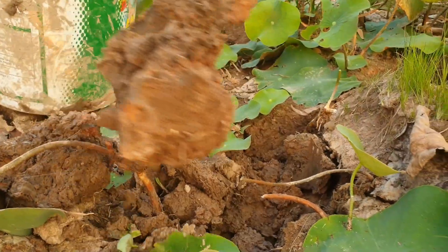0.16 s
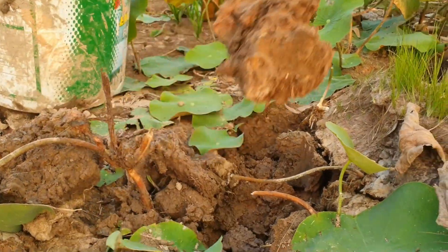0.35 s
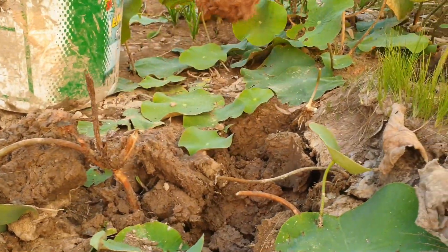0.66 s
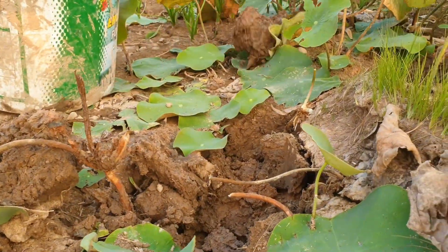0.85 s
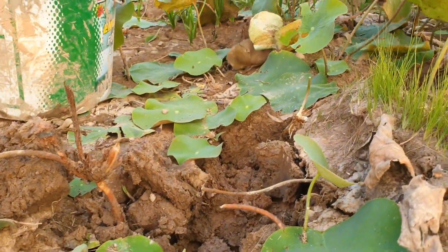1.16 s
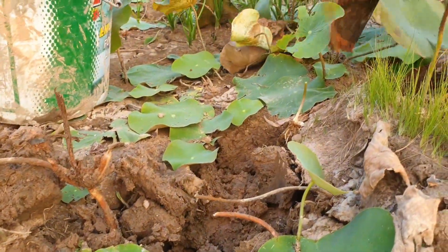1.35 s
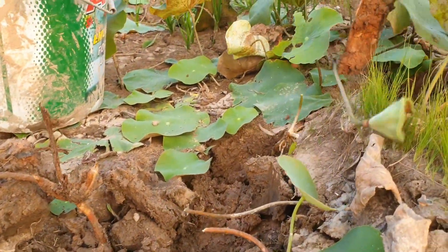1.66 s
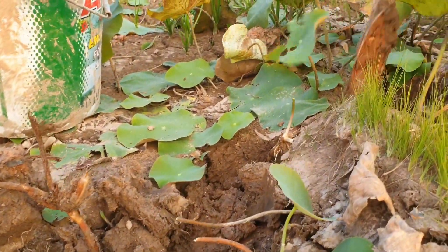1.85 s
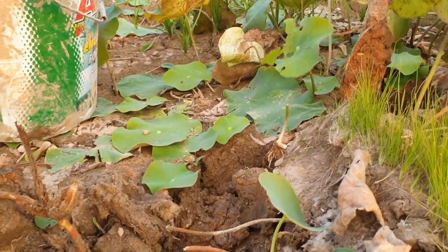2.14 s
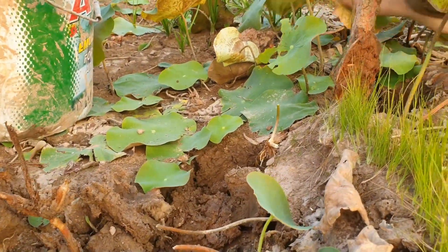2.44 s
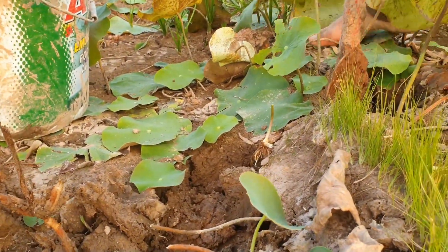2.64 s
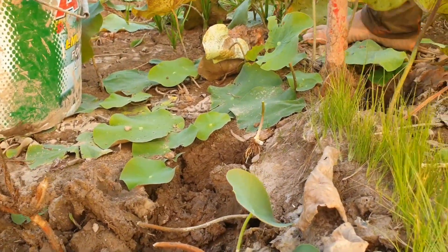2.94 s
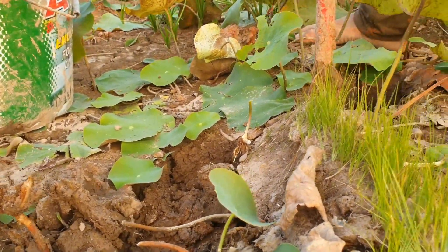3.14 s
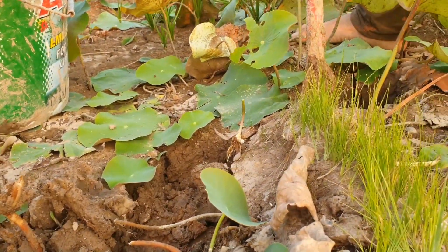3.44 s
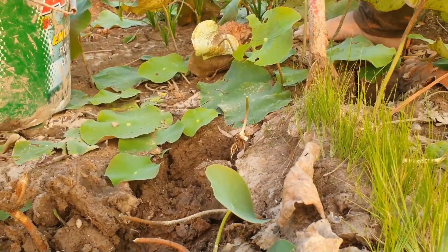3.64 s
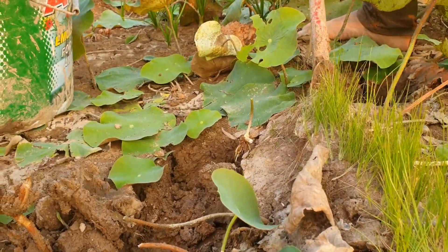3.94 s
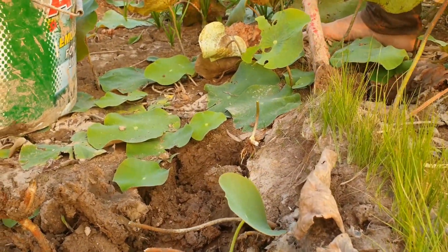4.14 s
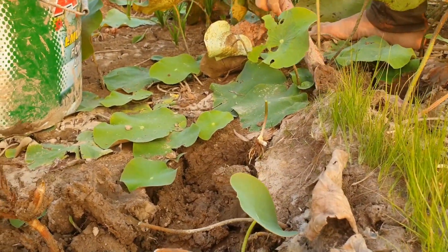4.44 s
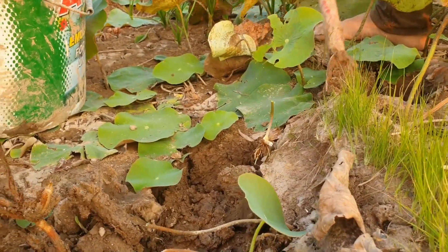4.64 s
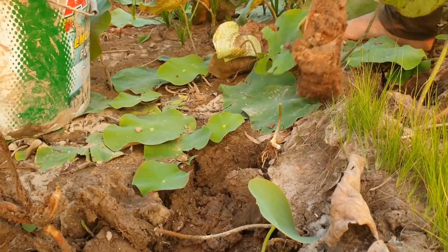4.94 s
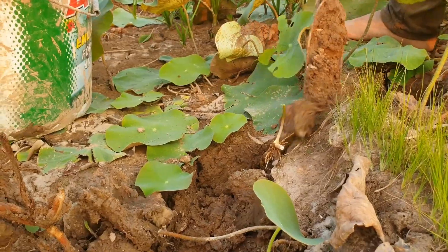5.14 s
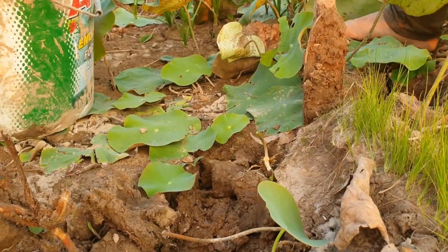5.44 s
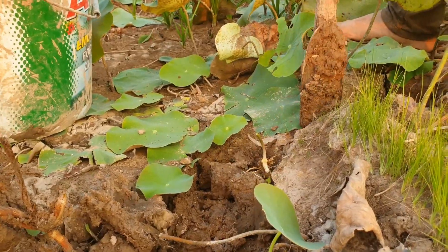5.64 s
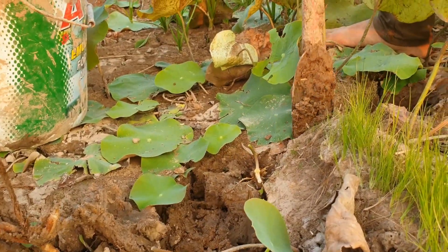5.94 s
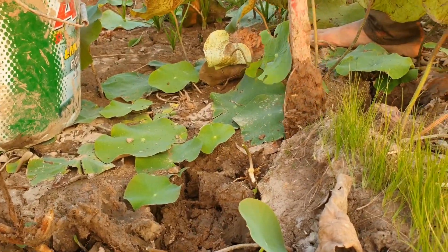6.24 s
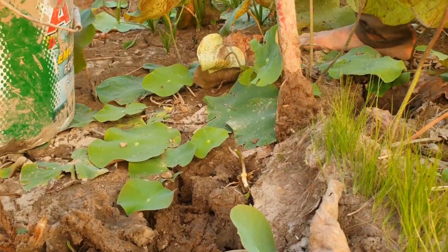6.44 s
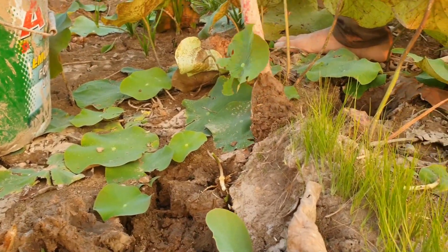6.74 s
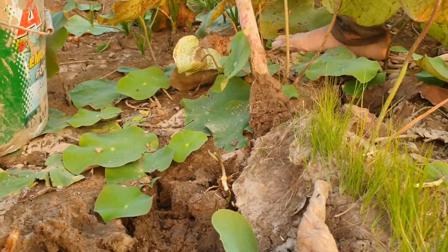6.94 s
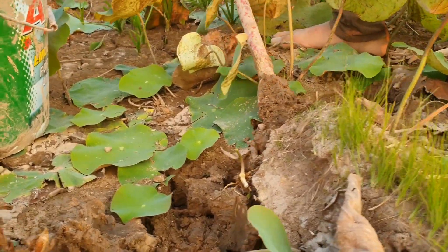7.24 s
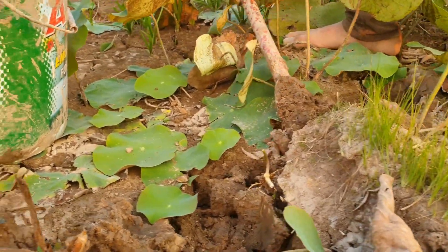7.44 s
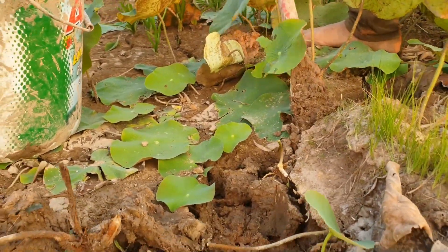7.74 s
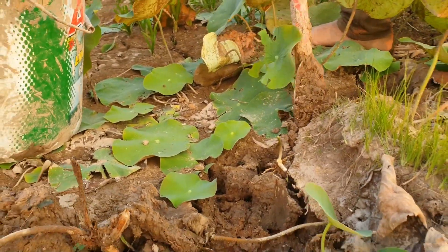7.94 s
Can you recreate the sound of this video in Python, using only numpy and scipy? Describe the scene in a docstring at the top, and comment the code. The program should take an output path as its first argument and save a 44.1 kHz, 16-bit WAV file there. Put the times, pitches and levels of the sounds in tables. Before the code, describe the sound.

A clod of damp clay slaps through leaves and thuds down, then a spade slides into wet earth and levers it loose with snapping roots.

```python
"""Digging damp clay with a spade

A spade works damp clay in a drained lotus pond, close to the microphone. A thrown clod slaps through
leaves and thuds down; the blade then slides in and levers the bank loose. Clay, roots and leaves are
clouds of tiny noise bursts, snaps are bright ringing bursts, and thuds are sagging low tones with a puff
of noise. Behind them lie filtered noise for the outdoor rumble and noise bands for drone and insects."""
import sys
import numpy as np
from scipy import signal
from scipy.fft import rfft, irfft, next_fast_len
from scipy.io import wavfile
from scipy.ndimage import uniform_filter1d

SR = 44100
rng = np.random.default_rng(int(sys.argv[2]) if len(sys.argv) > 2 else 0)


def persist_wave(psi):
    """Save psi, clipped to +-1, as 16-bit WAV."""
    counts = np.round(np.clip(psi, -1, 1) * 32767).astype(np.int16)
    wavfile.write(sys.argv[1], SR, np.atleast_2d(counts).T)


N = 356592  # length of the scene in samples


def amp(db):
    """Turns decibels into a gain."""
    return 10 ** (np.asarray(db) / 20)


def unit(x):
    """Scales a sound to an rms of one."""
    return x / np.sqrt(np.mean(x ** 2) + 1e-20)


def read(points, hz):
    """Reads a spectrum between its points, on a log-frequency axis."""
    f, value = np.transpose(points)
    return np.interp(np.log(hz + 1), np.log(f + 1), value)


def add(mix, s, sound):
    """Adds a stereo sound to the mix at time s, cutting what falls outside."""
    at = round(s * SR)
    sound = sound[:, max(-at, 0):]
    part = mix[:, max(at, 0):][:, :sound.shape[1]]
    part += sound[:, :part.shape[1]]


def colour(x, gain):
    """Filters x by a gain that is a function of frequency."""
    size = next_fast_len(x.shape[-1] + 512)
    spectrum = rfft(x, size) * gain(np.fft.rfftfreq(size, 1 / SR))
    return irfft(spectrum, size)[..., :x.shape[-1]]


# how alike left and right are: (frequency [Hz], likeness [0-1])
LIKENESS = [(60, 0.75), (250, 0.7), (600, 0.97), (1100, 0.58), (2000, 0.55), (4000, 0.052), (8000, 0.047),
            (16000, 0.078)]


def pair(n):
    """White noise at two microphone ports: largely shared up to about 2 kHz, nearly unrelated from 4 kHz."""
    a, b = rfft(rng.standard_normal((2, n)))
    alike = np.clip(read(LIKENESS, np.fft.rfftfreq(n, 1 / SR)), 0, 1)
    return irfft(np.array([a, alike * a + np.sqrt(1 - alike ** 2) * b]), n)


def ring(x, hz, q):
    """A resonance: it favours sound near one pitch, and a low q makes it broad and quick to die."""
    w = 2 * np.pi * min(hz, SR / 2 - 1000) / SR
    damp = np.sin(w) / (2 * q)
    return signal.lfilter([damp, 0, -damp], [1 + damp, -2 * np.cos(w), 1 - damp], x)


def grains(n, per_s, spread_db, grain_s, count=8, size=256):
    """A cloud of tiny fractures of random strength, each a short fading burst in one of a few shapes."""
    strength_db = spread_db * np.minimum(rng.exponential(1, n), 4.5)
    clicks = amp(strength_db) * (rng.random(n) < per_s / SR)
    clicks *= rng.choice([-1, 1], n)
    shape = rng.integers(0, count, n)
    fade = np.exp(-np.arange(size) / SR / grain_s)
    cloud = np.zeros((2, n))
    for k in range(count):
        burst = unit(pair(size) * fade)
        cloud += signal.oaconvolve((clicks * (shape == k))[None], burst, axes=1)[:, :n]
    return unit(cloud)


# shape of the open-air rumble: (frequency [Hz], relative level [dB])
RUMBLE = [(20, -30), (40, 1), (60, 3), (90, -3), (125, -1), (170, -8.5), (250, -12.5), (400, -30.5),
          (800, -41), (2000, -45), (5000, -45), (10000, -33.5), (16000, -59)]
# far drone and insect bands: (centre [Hz], width [Hz], rms level [dB])
DRONE_AND_INSECTS = [(63.8, 8.5, -54), (110, 13, -64.5), (2030, 200, -84), (7054, 140, -66.5),
                     (7450, 520, -66.5), (11200, 1300, -73)]


def background(rumble_db=-55, pan_db=-3):
    """Outdoor rumble is shaped noise; the far drone and thin insect song are narrower bands of noise."""
    air = amp(rumble_db) * unit(colour(pair(N), lambda hz: amp(read(RUMBLE, hz))))
    for centre, width, db in DRONE_AND_INSECTS:
        band = colour(pair(N), lambda hz: 1 / (1 + (2 * (hz - centre) / width) ** 2))
        air += amp(db) * unit(band)
    # the lows lean to the right
    sides = np.array([[pan_db], [-pan_db]]) / 2
    return colour(air, lambda hz: amp(sides / (1 + (hz / 400) ** 2)))


# steady strain of the spade on the bank between pushes: (time [s], effort [dB])
STEADY_STRAIN = [(0.7, -88), (1.45, -62), (3.1, -69), (3.3, -65.5), (3.5, -67.5), (3.8, -60), (4.05, -65),
                 (4.47, -65.5), (5.0, -73), (5.45, -67), (5.55, -59.5), (5.85, -61.5), (6.1, -69.5),
                 (6.3, -64), (6.8, -58.5), (7.5, -65.5), (7.95, -73), (8.08, -67.5)]
# under steady strain the clay stays below the roots, and the leaves follow only part of each change
STRAIN_CLAY_DB, STRAIN_LEAVES_DB, STRAIN_USUAL_DB, LEAVES_FOLLOW = -5, -62.5, -65, 0.43
# pushes of the spade and tumbles of clods: (start [s], hold [s], effort [dB],
# swell over the hold [dB], extra clay [dB], extra leaves [dB])
SPADE_PUSHES = [(0.0, 0.039, -47.5, -4.5, -2, 2), (0.148, 0.049, -56, -2.5, -4, -1.5),
                (0.37, 0.048, -66.5, 0, -6, 5), (0.759, 0.045, -56, 7.5, -6, -0.5),
                (0.822, 0.583, -46.5, -7.5, 0.5, 1.5), (1.445, 0.058, -66.5, -3, 4, 9),
                (1.573, 0.12, -71, 5.5, 11.5, -14), (1.699, 0.034, -49.5, 0, -2.5, 1),
                (1.848, 0.015, -58.5, 3.5, -7, -5), (2.062, 0.06, -54, -5.5, 1.5, -3),
                (2.313, 0.23, -49.5, 5, -3, -3), (2.559, 0.47, -50, -8.5, -0.5, -0.5),
                (3.593, 0.084, -67.5, 2.5, 2.5, 6), (3.906, 0.054, -54.5, 0, -3.5, -3),
                (4.108, 0.28, -60, 4, -2.5, 1), (4.558, 0.21, -58, -4.5, -0.5, -1),
                (4.82, 0.066, -60.5, -0.5, -1, 3), (5.065, 0.11, -60.5, 7, -9.5, 1.5),
                (5.304, 0.025, -48.5, -4, -16, -1), (5.352, 0.1, -72, 5.5, -19, 14),
                (6.232, 0.14, -56, -2.5, -2, 1.5), (6.508, 0.1, -43.5, 8, -15.5, -5),
                (6.927, 0.48, -59.5, 6.5, -4.5, -2), (7.585, 0.065, -61.5, -1, -2.5, 5)]
ATTACK_DB_PER_S, RELEASE_DB_PER_S = 478, 250


def work():
    """Work on clay, roots and leaves in dB: the steady strain plus pushes that attack, hold and release."""
    t = np.arange(0, N, 64) / SR
    strain = np.interp(t, *np.transpose(STEADY_STRAIN))
    leaves_strain = STRAIN_LEAVES_DB + LEAVES_FOLLOW * (strain - STRAIN_USUAL_DB)
    power = amp([strain + STRAIN_CLAY_DB, strain, leaves_strain]) ** 2
    for start, hold, db, swell_db, clay_db, leaves_db in SPADE_PUSHES:
        age = t - start
        push = db + swell_db * np.clip(age / hold, 0, 1)
        push -= ATTACK_DB_PER_S * np.maximum(-age, 0) + RELEASE_DB_PER_S * np.maximum(age - hold, 0)
        power += amp([push + clay_db, push, push + leaves_db]) ** 2
    return [np.interp(np.arange(N) / SR, t, 10 * np.log10(p)) for p in power]


def hollows(x, patchy_db=3.5):
    """Cavities open and close between the clods: short-lived resonances come and go."""
    z = signal.stft(x, nperseg=512)[2]
    field = rng.standard_normal(z.shape[1:])
    field = uniform_filter1d(field, size=6, axis=0)  # smooth over pitch
    field = unit(uniform_filter1d(field, size=5, axis=1))  # smooth over time
    return signal.istft(z * amp(patchy_db * field), nperseg=512)[1][:, :x.shape[1]]


def worked(work_db, spectrum, db, per_s, spread_db, grain_s, clump_db):
    """One material giving way: grains come in stick-slip clumps, as strong as the work on it."""
    slips = np.clip(unit(uniform_filter1d(rng.standard_normal(N), size=400)), -2, 2)
    cloud = hollows(grains(N, per_s, spread_db, grain_s) * amp(clump_db * slips))
    cloud = colour(cloud, lambda hz: amp(read(spectrum, hz)))
    # the work done in each moment is shared among its grains
    power = abs(uniform_filter1d((cloud ** 2).mean(0), size=4000))
    cloud /= np.sqrt(power + 1e-9)
    return cloud * amp(db + work_db)


def heft(clay, work_db, under_hz=480, full_db=-50, bass_db_per_db=0.2, most_db=2, least_db=-7):
    """Only hard work moves whole lumps, so the bass of the clay fades faster than its level."""
    lumps = colour(clay, lambda hz: 1 / (1 + (hz / under_hz) ** 4))
    bass_db = np.clip(bass_db_per_db * (work_db - full_db), least_db, most_db)
    return clay + lumps * (amp(bass_db) - 1)


# colours of the clay, root and leaf grains: (frequency [Hz], relative level [dB])
CLAY_COLOUR = [(60, -19), (150, -0.5), (260, 2), (480, -1), (1100, -3), (1900, -1.5), (3000, -5),
               (6000, -22.5)]
ROOT_COLOUR = [(600, -49), (1600, -20), (2600, 0), (3700, 0), (6000, -3), (7500, 0), (10000, -16),
               (16000, -12.5)]
LEAF_COLOUR = [(2000, -86), (5000, -1.5), (7200, -1), (9000, -2), (12000, 1.5), (15500, -6)]


def digging(clay_db, roots_db, leaves_db):
    """Clay crumbles low, roots tear in the middle, leaves and grass rustle on top."""
    clay = worked(clay_db, CLAY_COLOUR, db=2.7, per_s=1100, spread_db=1.5, grain_s=0.0015, clump_db=1.4)
    roots = worked(roots_db, ROOT_COLOUR, db=0.88, per_s=1200, spread_db=-0.5, grain_s=0.0013, clump_db=-0.7)
    leaves = worked(leaves_db, LEAF_COLOUR, db=2.5, per_s=2400, spread_db=2.5, grain_s=0.0016, clump_db=2.5)
    return heft(clay, clay_db) + roots + leaves


# resonances of the clay-caked steel blade: (centre [Hz], width [Hz], relative level [dB])
BLADE_RINGS = [(1000, 850, -8.5), (2150, 720, -4.5), (3500, 740, 4.5), (4405, 260, 6), (5860, 1170, 1)]
# how freely the blade rings, high once it is lifted out: (time [s], share [0-1])
BLADE_FREEDOM = [(5.2, 0.22), (5.29, 0.92), (5.8, 0.57), (6.4, 0.85), (6.6, 0)]


def blade(x, db=4):
    """Crumbs breaking on the blade take on its damped ring, the more so the freer it is."""
    free = np.clip(np.interp(np.arange(N) / SR, *np.transpose(BLADE_FREEDOM)), 0, 1)
    steel = sum(amp(mode_db + db) * ring(x, hz, hz / width) for hz, width, mode_db in BLADE_RINGS)
    # the ring takes the place of much of the plain sound
    return x - 0.98 * free * ring(x, 3350, 0.36) + free * steel / 2


def bank(x, db=-15, t60=0.031, size=8192):
    """Earth banks and leaves throw back a short, faint scatter of echoes."""
    t = np.arange(size) / SR
    sparse = (rng.random((2, size)) < .06) * (t > .003)
    taps = rng.standard_normal((2, size)) * sparse * amp(-60 * t / t60)
    taps /= np.linalg.norm(taps, axis=1, keepdims=True)
    return x + amp(db) * signal.oaconvolve(x, taps, axes=1)[:, :N]


# clods brushing leaves or tearing loose: (time of the crest [s], rms level [dB], centre [Hz], fall [s])
CLOD_CRUNCHES = [(0.009, -34, 6060, 0.0037), (0.811, -28.5, 3500, 0.0035), (0.826, -27.5, 2200, 0.011),
                 (0.835, -25, 6800, 0.0047), (0.87, -36, 7030, 0.01), (0.968, -39.5, 1500, 0.012),
                 (1.01, -37.5, 1000, 0.019), (1.101, -33, 5460, 0.01), (1.163, -36, 6450, 0.01),
                 (1.313, -29.5, 6150, 0.0044), (1.3151, -26.5, 680, 0.0072), (1.32, -38.5, 1380, 0.011),
                 (1.388, -41, 1770, 0.015), (1.457, -40, 1000, 0.0057), (1.517, -33.5, 2270, 0.0066),
                 (2.526, -37.5, 1800, 0.024), (4.323, -40, 1740, 0.015), (4.324, -43, 10000, 0.008),
                 (4.842, -35, 11000, 0.006), (5.154, -39, 5000, 0.01), (5.181, -37.5, 675, 0.0069),
                 (6.271, -32.5, 1300, 0.0013), (6.606, -36, 5270, 0.033), (7.02, -37, 1710, 0.0079),
                 (7.265, -43, 2500, 0.028)]
CRUNCH_RISE_SHARE = 0.45  # a crunch swells in this share of the time it takes to fall


def crunches(q=0.84, per_s=3500, spread_db=2.5):
    """A dense rush of fractures swells to a crest and dies away."""
    out = np.zeros((2, N))
    t = np.arange(-SR // 8, SR // 5) / SR  # zero at the crest
    for s, crest_db, hz, fall in CLOD_CRUNCHES:
        swell = np.exp(np.where(t < 0, t / (CRUNCH_RISE_SHARE * fall), -t / fall))
        rush = ring(grains(len(t), per_s, spread_db, 0.00053, count=4), hz, q) * swell
        rush *= np.linalg.norm(swell) / np.linalg.norm(rush.mean(0)) / np.sqrt(2)
        add(out, s + t[0], amp(crest_db) * rush)
    return out


def snap(peak_db, hz, pan_db, q=1.6, bright_db=-8, rings_db=-1, ring_q=8, ring_octaves=1.76,
         crack_s=0.0026, tick_db=5, tick_s=0.00022, scatter_db=-21, scatter_s=0.0094, size=2048):
    """A fibre breaks with a tick, a sharp burst and a few brief rings; leaves scatter a faint tail."""
    t = np.arange(size) / SR
    tick = amp(tick_db) * np.exp(-t / tick_s)
    crack = np.exp(-t / crack_s)
    scatter = amp(scatter_db) * np.exp(-t / scatter_s)
    burst = pair(size) * (tick + crack + scatter)
    sound = ring(burst, hz, q) + amp(bright_db) * ring(burst, hz, 0.42)
    for octaves in rng.uniform(-ring_octaves, 1, size=3):
        sound += amp(rings_db) * ring(burst, hz * 2 ** octaves, ring_q)
    sides_db = np.array([[pan_db], [-pan_db]]) / 2
    return sound / abs(sound).max(1, keepdims=True) * amp(peak_db + sides_db)


# roots, stalks and crumbs snapping, before the shared level and pitch settings below:
# (time [s], peak level [dB], centre [Hz], left minus right [dB])
FIBRE_SNAPS = [(0.0198, -23, 8100, 6), (0.83, -19, 8200, -3), (0.834, -14, 7650, 7), (1.215, -26, 5400, 1),
               (1.518, -36, 4550, 5), (1.5967, -30.5, 4730, 2), (1.937, -25, 6760, 3),
               (1.9998, -16.5, 4900, -0.5), (2.0025, -20, 4630, -2), (2.849, -30, 9500, -2),
               (3.1762, -37, 11000, -11), (3.257, -33, 7700, -2), (3.4344, -36, 10100, -10),
               (3.6705, -29.5, 6300, 0), (3.851, -30.5, 9800, -2), (4.1651, -23.5, 6400, 0),
               (4.168, -20.5, 4970, -1), (4.2391, -20, 4260, 1), (4.3184, -23, 8700, -4),
               (4.389, -28.5, 8200, -1), (4.5598, -29.5, 8340, -3), (4.839, -17.5, 7700, -2),
               (5.092, -27, 9100, -2), (5.1354, -22.5, 6200, 5), (5.151, -20.5, 6150, 3.5),
               (5.321, -30.5, 4060, 4), (5.436, -31, 7160, -4), (5.4647, -31, 5560, 2),
               (5.512, -27.5, 4900, 5), (5.6804, -30.5, 6230, 0), (5.7282, -30.5, 4800, -2),
               (5.759, -28.5, 4100, 1.5), (6.138, -31.5, 7200, 4), (6.455, -30, 3400, 0),
               (6.7713, -27, 6760, 1), (6.8829, -22, 4570, -4), (6.9184, -28, 6460, 4),
               (6.9382, -26.5, 5340, 0), (6.968, -21.5, 8100, -1), (7.0181, -27.5, 4970, -3),
               (7.075, -19.5, 8900, -2.5), (7.1894, -27, 5600, 3), (7.234, -25, 5900, 3),
               (7.2604, -21.5, 10100, 2), (7.322, -25, 7740, 1), (7.3435, -25, 6900, -1),
               (7.3782, -25, 7300, 0)]


def snaps(db=1.0, pitch_factor=0.837):
    """The loud breaks of roots, stalks and crumbs, each at its own time and side."""
    out = np.zeros((2, N))
    for s, peak_db, hz, pan_db in FIBRE_SNAPS:
        add(out, s, snap(peak_db + db, hz * pitch_factor, pan_db))
    return out


def thud(db, hz, t60, puff_db=-8, puff_q=1.18, sag=0.15, onset_s=0.00015, size=16384):
    """Soft ground takes a blow: a damped swing that sags in pitch, with a puff of loose earth."""
    t = np.arange(size) / SR
    pitch = hz * (1 + sag * np.exp(-t / 0.0088))
    swing = np.sin(2 * np.pi * np.cumsum(pitch) / SR)
    puff = unit(ring(ring(pair(size), hz, puff_q), hz, puff_q))
    # the longer the ground gives, the softer the blow begins
    press = 1 - np.exp(-t / (onset_s + t60 ** 2 / 4))
    return press * (swing + amp(puff_db) * puff) * amp(db - 60 * t / t60)


# dull blows of clay and blade: (time [s], level before the soft onset [dB], settled pitch [Hz],
# time to fall by 60 dB [s])
DULL_BLOWS = [(0.826, -36, 254, 0.14), (.959, -33.5, 224, 0.14), (1.004, -40.5, 335, 0.061),
              (1.105, -40.5, 137, 0.14), (1.3132, -13, 223, 0.01), (1.3154, -31, 76, 0.19),
              (1.455, -39.5, 247, 0.065), (1.946, -34.5, 94.6, 0.26), (2.060, -41, 233, 0.051),
              (2.894, -42, 238, 0.082), (5.178, -32, 240, 0.031), (6.269, -35, 342, 0.012),
              (6.459, -31.5, 151, 0.036), (6.471, -32, 181, 0.19), (7.304, -37.5, 166, 0.096),
              (7.367, -40, 225, 0.086), (7.561, -42, 213, 0.085)]
SHIFTING = (7.4, 8.09)  # while the loosened block of clay shifts on the blade: (start [s], end [s])


def thuds(count=7, bump_db=-48, bump_hz=232, bump_octaves=0.3, bump_t60=0.1):
    """The dull blows, then an uneven run of soft bumps as the loosened block shifts."""
    out = np.zeros((2, N))
    for s, db, hz, t60 in DULL_BLOWS:
        add(out, s, thud(db, hz, t60))
    for k, (late, pitch) in enumerate(rng.random((count, 2))):
        s = SHIFTING[0] + (k + late) / count * (SHIFTING[1] - SHIFTING[0])
        add(out, s, thud(bump_db, bump_hz * 2 ** (bump_octaves * (pitch - .5)), bump_t60))
    return out


def moving(x, hz, width):
    """A resonance that follows the curve hz: shift that pitch to zero, smooth, and shift back."""
    turn = np.exp(2j * np.pi * np.cumsum(hz) / SR)
    r = np.exp(-np.pi * width / SR)
    return 2 * (turn * signal.lfilter([1 - r], [1, -r], x / turn)).real


# the blade sliding along wet clay, before the shared level setting below: (start [s], end [s],
# crest rms level [dB], first pitch [Hz], last pitch [Hz], width of each resonance pass [Hz])
BLADE_SCRAPES = [(1.655, 1.743, -42.5, 1150, 800, 960), (2.248, 2.443, -45.5, 1300, 1080, 1200),
                 (2.266, 2.417, -45, 5360, 5900, 2000), (2.636, 2.742, -44.5, 3300, 2980, 1400),
                 (4.58, 4.77, -51, 2300, 800, 970), (6.484, 6.69, -47, 3020, 3360, 1700)]


def scrapes(per_s=1800, spread_db=3, db=-1):
    """Wet clay drags on the blade; the gap between them changes, so its hollow pitch slides."""
    out = np.zeros((2, N))
    for start, end, crest_db, first_hz, last_hz, width in BLADE_SCRAPES:
        n = max(int((end - start) * SR), 512)
        hz = np.geomspace(first_hz, last_hz, n)
        drag = grains(n, per_s, spread_db, 0.0011, count=4)
        drag = moving(moving(drag, hz, width), hz, width)
        swell = np.sin(np.linspace(0, np.pi, n))
        add(out, start, unit(drag) * swell * amp(crest_db + db))
    return out


PRYING = (3.15, 7.7)  # while the spade levers the bank and roots part: (start [s], end [s])


def grit(roots_db, leaves_db, count=260, over_db=21, spread_db=5.0, ceiling_db=-29,
         low_hz=1900, octaves=2.7, side_db=9, crack_s=0.00097):
    """Under the lever, rootlets and crumbs tick at random, louder (up to a ceiling) in harder work."""
    out = np.zeros((2, N))
    effort_db = np.maximum(roots_db, leaves_db - 11)
    for when, strength, pitch, side in rng.random((count, 4)):
        s = PRYING[0] + when * (PRYING[1] - PRYING[0])
        peak_db = effort_db[min(int(s * SR), N - 1)] + over_db + spread_db * (2 * strength - 1)
        hz = low_hz * 2 ** (octaves * pitch)
        add(out, s, snap(min(peak_db, ceiling_db), hz, side_db * (side - .5), crack_s=crack_s))
    return out


LEFT_LAG_MS = 0.096


def scene():
    """The digging is to the right, so it reaches the left port a little late."""
    clay_db, roots_db, leaves_db = work()
    breaking = digging(clay_db, roots_db, leaves_db) + grit(roots_db, leaves_db) + snaps()
    near = bank(blade(breaking) + scrapes() + crunches() + thuds())
    near[0] = colour(near[0], lambda hz: np.exp(-2j * np.pi * hz * LEFT_LAG_MS / 1000))
    return near + background()


# difference in colour between the ports: (frequency [Hz], left minus right [dB])
PORT_DIFFERENCE = [(60, -1.5), (125, -1), (250, -8.5), (600, 1), (1100, 2), (2200, -0.6), (4400, 1),
                   (7000, 2), (9000, -6), (15000, -8)]
EDGE_HZ = 15950  # top of the band that is kept


def record(dry):
    """The two ports differ in colour; then a steep low-pass limits the band."""
    sides = np.array([[1], [-1]])
    ports = colour(dry, lambda hz: amp(sides * read(PORT_DIFFERENCE, hz) / 2))
    low_pass = signal.firwin(511, EDGE_HZ, window=("kaiser", 9), fs=SR)
    return signal.oaconvolve(ports, low_pass[None], "same")


dry = scene()
out = record(dry)
persist_wave(out)
```